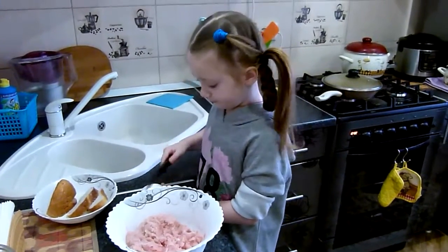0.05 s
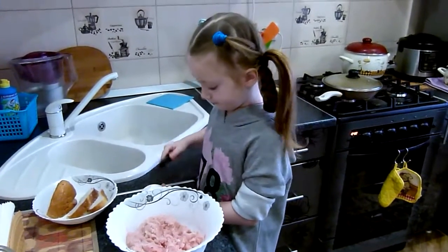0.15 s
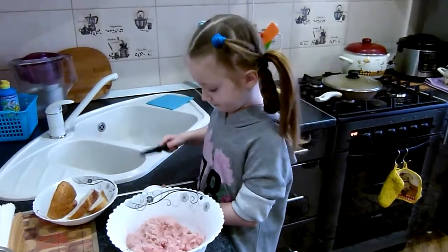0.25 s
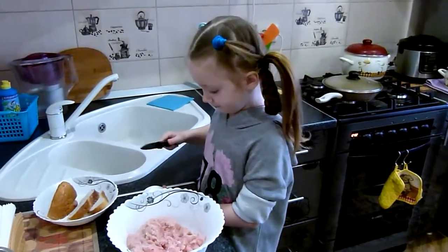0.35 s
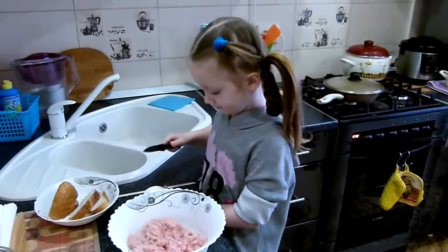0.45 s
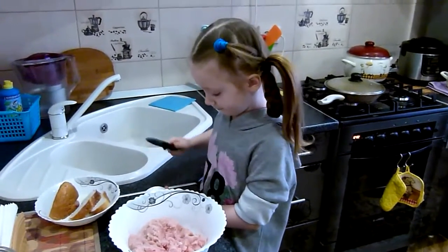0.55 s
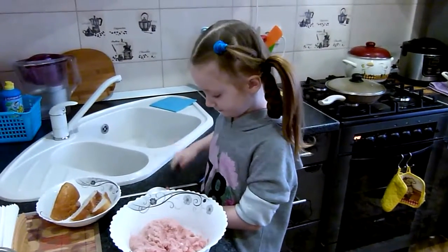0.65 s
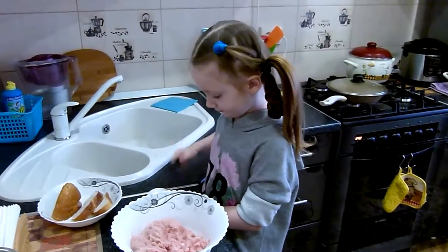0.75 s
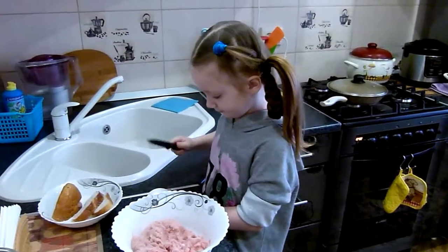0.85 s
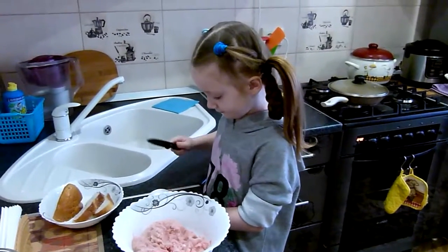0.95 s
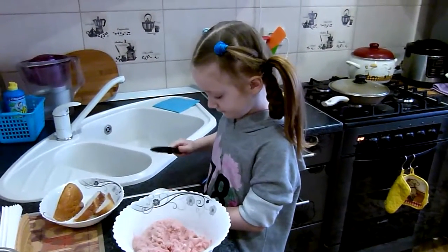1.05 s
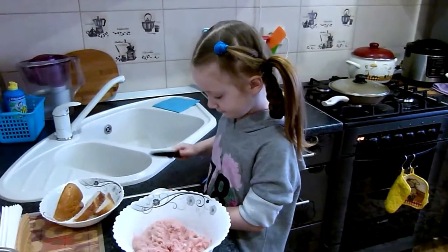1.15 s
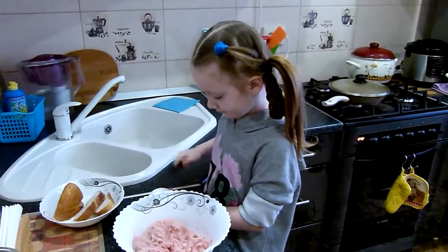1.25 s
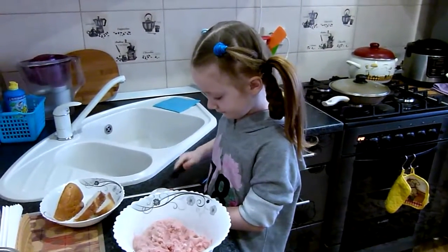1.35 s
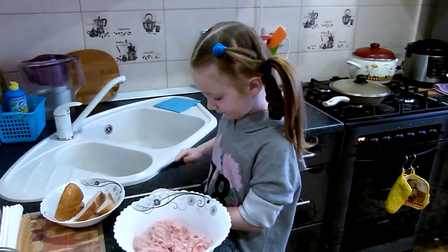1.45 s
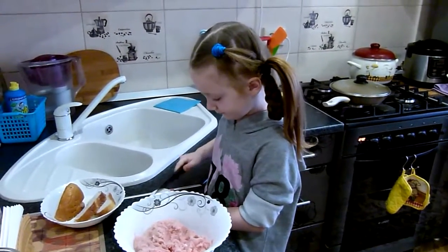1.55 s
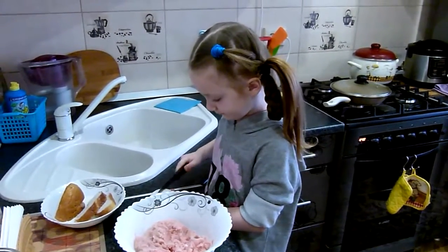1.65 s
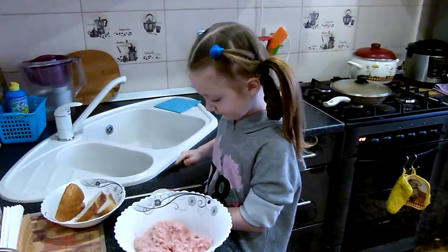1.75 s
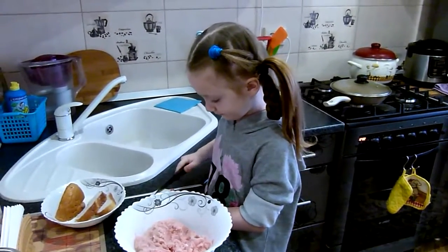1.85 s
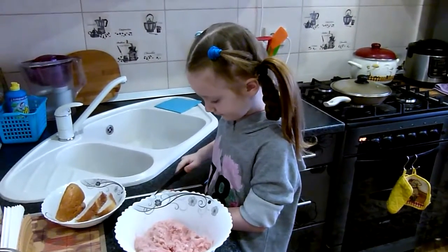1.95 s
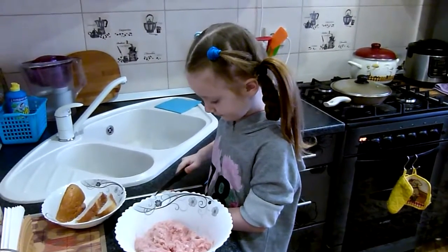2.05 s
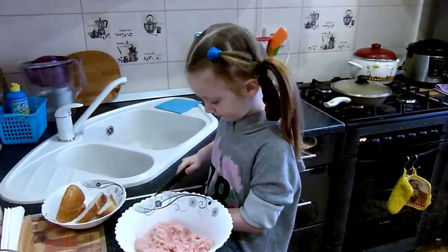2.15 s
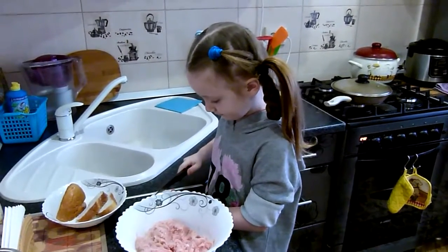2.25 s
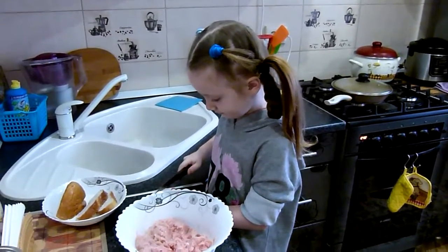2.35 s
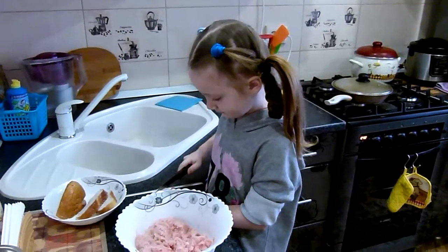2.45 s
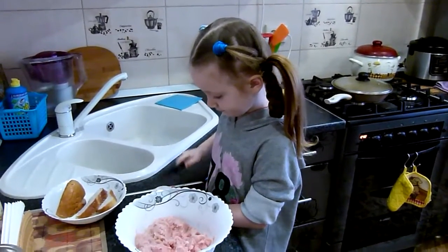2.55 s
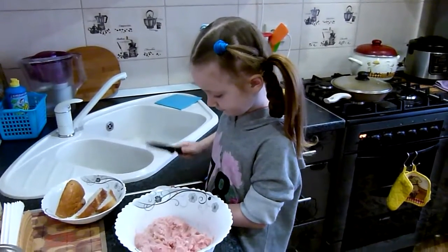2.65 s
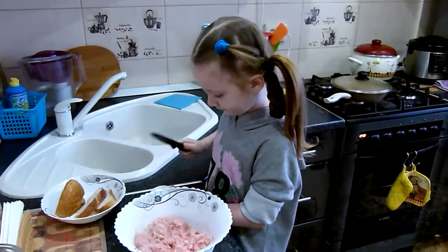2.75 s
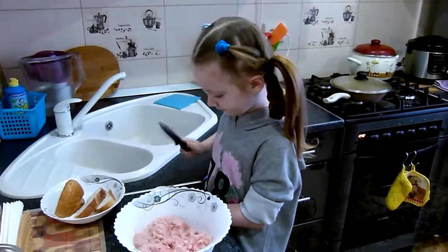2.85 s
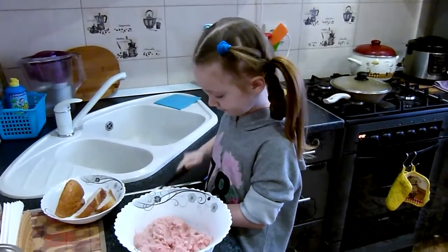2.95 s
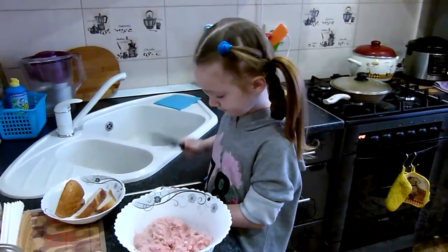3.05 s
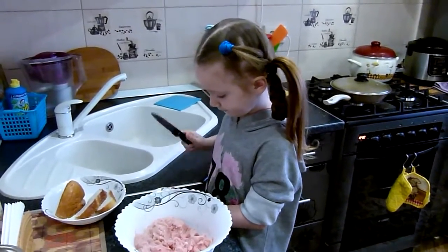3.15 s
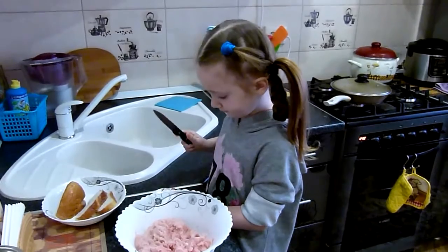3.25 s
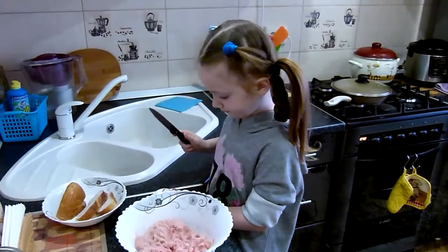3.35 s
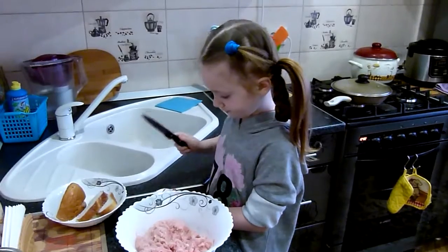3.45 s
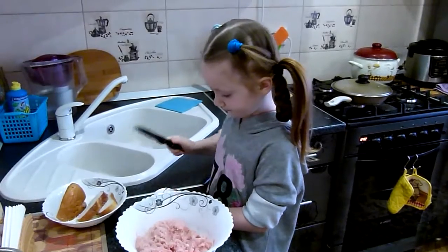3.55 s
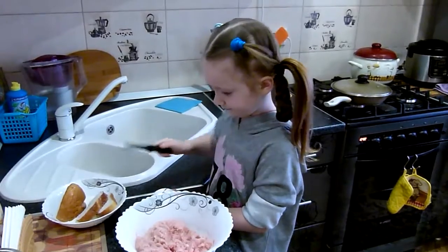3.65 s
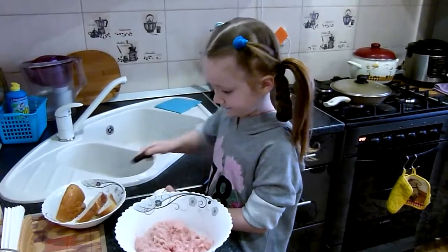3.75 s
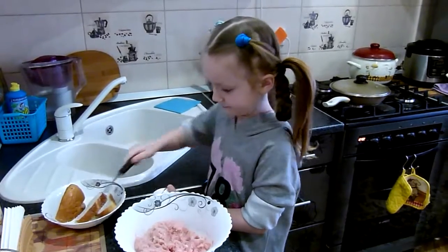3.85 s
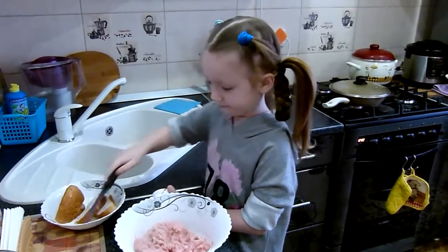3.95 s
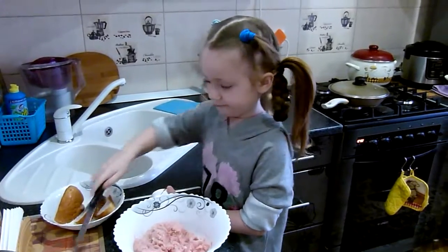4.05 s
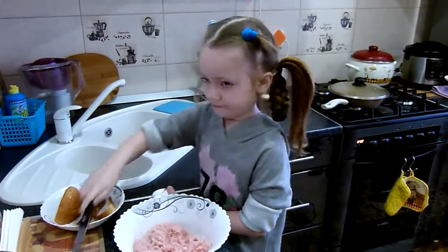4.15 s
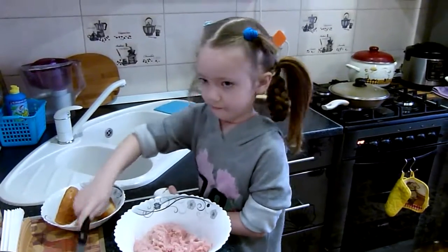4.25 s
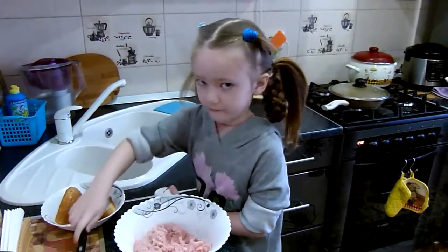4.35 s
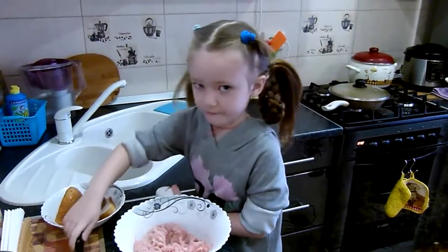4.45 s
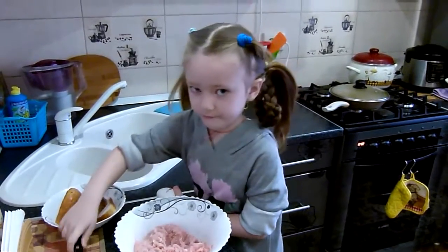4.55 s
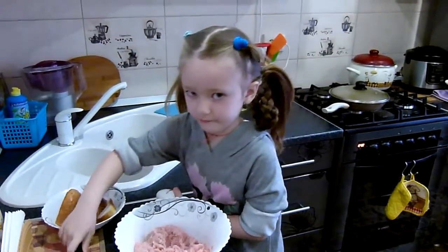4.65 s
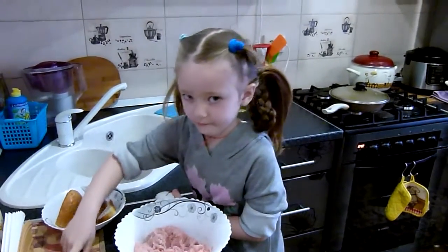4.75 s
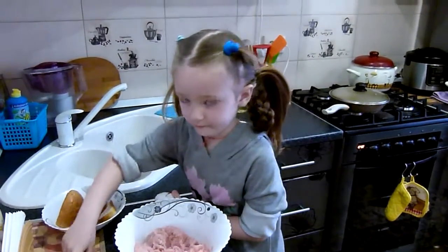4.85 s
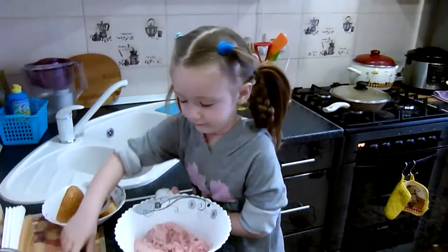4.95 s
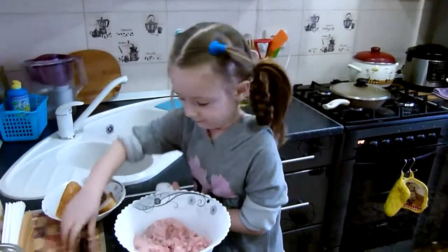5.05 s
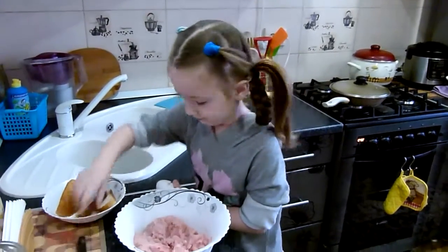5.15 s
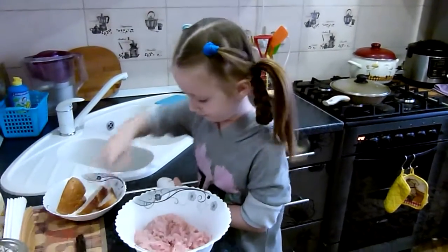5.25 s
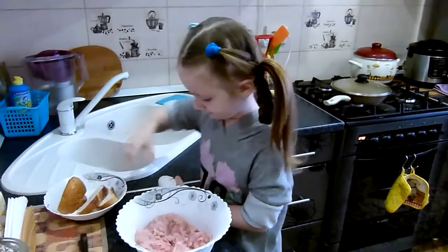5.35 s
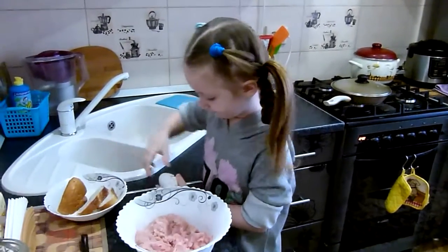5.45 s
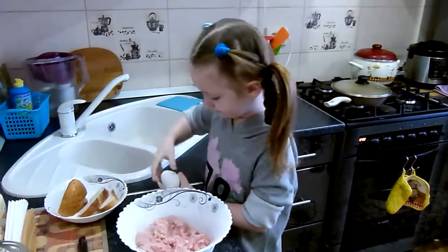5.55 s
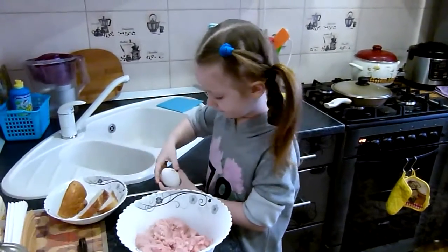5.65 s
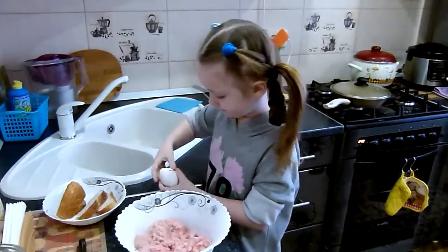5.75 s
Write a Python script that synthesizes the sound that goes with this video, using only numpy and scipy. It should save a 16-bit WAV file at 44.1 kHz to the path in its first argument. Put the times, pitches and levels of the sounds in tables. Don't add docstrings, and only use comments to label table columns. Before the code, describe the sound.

In a small tiled kitchen with a steady soft hush and faint bubbling, a knife taps an egg five times, unevenly, then barely touches it. One loud, fuller crack follows. After a pause the knife is laid down with small knocks, a short scrape and a bright ceramic clink, then settles. Close stereo microphone, slightly dull treble, short room tail.

```python
import sys
import numpy as np
from scipy import signal
from scipy.io import wavfile
from scipy.ndimage import uniform_filter1d

SR = 44100
rng = np.random.default_rng(int(sys.argv[2]) if len(sys.argv) > 2 else 0)


def materialize(psi):
    bounded = np.clip(np.atleast_2d(psi).T, -1, 1)
    quanta = np.round(bounded * 32767).astype(np.int16)
    wavfile.write(sys.argv[1], SR, quanta)


def attenuation_scalar(level_db):
    decades = np.asarray(level_db, float) / 20
    return 10 ** decades


N = 255603
LEAD = 500


def evened(x):
    return x / np.sqrt(np.mean(x ** 2) + 1e-20)


def read(points, hz):
    f, value = np.transpose(points)
    return np.interp(np.log(hz + 1), np.log(f + 1), value)


def add(mix, s, sound):
    part = mix[:, round((s + .001) * SR) - LEAD:][:, :sound.shape[1]]
    part += sound[:, :part.shape[1]]


def causal(db):
    both_sides = np.r_[db, db[-2:0:-1]]
    log_gain = np.log(attenuation_scalar(np.maximum(both_sides, -100)))
    return np.fft.ifft(np.exp(np.conj(signal.hilbert(log_gain)))).real[:2048]


def rings(modes, size=20000):
    t = np.arange(size) / SR
    total = np.zeros(size)
    for hz, db, t60 in modes:
        total += rng.choice([-1, 1]) * attenuation_scalar(db - 60 * t / t60) * np.sin(2 * np.pi * hz * t)
    return total


def pair(frames, hz, same, lean):
    a, b, c, d = rng.standard_normal((frames, len(hz), 4)).T
    like = np.clip(read(same, hz), -1, 1)[:, None]
    left = a + 1j * b
    right = like * left + np.sqrt(1 - like ** 2) * (c + 1j * d)
    return np.array([left, right]) * attenuation_scalar(np.outer([.5, -.5], read(lean, hz)))[:, :, None]


def band(lo_hz, hi_hz):
    sos = signal.butter(2, [lo_hz, hi_hz], "band", fs=SR, output="sos")
    return evened(signal.sosfilt(sos, rng.standard_normal(N)))


def stroke(start, length, rise_s, sag_db_per_s, stop_s):
    t = np.arange(N) / SR - start
    ends = np.clip(t / rise_s, 0, 1) * np.exp(-np.maximum(t - length, 0) / stop_s)
    return ends * attenuation_scalar(sag_db_per_s * np.maximum(t, 0))


# pitch in Hz, level in dB.
HUSH_COLOUR = [(24, -65), (40, -41.5), (81, -40), (212, -6.5), (282, -5), (308, -6), (336, -6.5), (664, -4),
               (944, -6.5), (1050, -6), (2480, -11.5), (5350, -14), (7600, -26), (9880, -57), (16700, -120)]
# pitch in Hz, likeness from -1 to 1.
HUSH_SAME = [(60, 0.32), (170, 1), (450, 0.65), (1250, -0.46), (3440, -0.67), (9460, 0.36)]
# pitch in Hz, left over right in dB.
HUSH_LEAN = [(60, -1), (170, -2), (450, -1), (1250, -0.5), (3440, 0.5), (9460, 0.5)]


def hush():
    frames, hz = N // 256 + 5, np.fft.rfftfreq(1024, 1 / SR)
    patches = rng.standard_normal((frames, 513)).T
    patches = evened(uniform_filter1d(uniform_filter1d(patches, 8, 0), 6, 1))
    depth_db = read([(200, 1.8), (900, 3.1), (2500, .8)], hz)[:, None]
    level_db = read(HUSH_COLOUR, np.minimum(hz, 7400))[:, None] + depth_db * patches
    z = pair(frames, hz, HUSH_SAME, HUSH_LEAN) * attenuation_scalar(level_db)
    z[:, hz > 8000] *= attenuation_scalar(-2.0)
    x = signal.istft(z, nperseg=1024, noverlap=768)[1][:, :N]
    return attenuation_scalar(-62) * x / np.sqrt(np.mean(x.mean(0) ** 2))


# pitch in Hz, time to fade by 60 dB in seconds.
ROOM_FADE = [(150, 0.46), (400, 0.51), (1040, 0.45), (2760, 0.43), (7280, 0.32)]
# pitch in Hz, time to fade by 60 dB in seconds.
BASS_FADE = [(70, .08), (130, 0.14)]
# pitch in Hz, likeness from -1 to 1.
TAIL_SAME = [(60, 0.15), (170, 0.6), (450, 0.87), (1250, 0.73), (3440, 0.17), (9460, 0.69)]
# pitch in Hz, left over right in dB.
TAIL_LEAN = [(60, -0.24), (170, -2.0), (450, -1.5), (1250, -1.0), (3440, 0.97), (9460, -0.35)]
# delay in seconds, left gain, right gain (plain factors).
ECHOES = [(.0019, -0.018, 0.26), (.0046, -1.1, -.8), (.0075, 0.27, 0.26), (.0092, .5, -0.44),
          (0.0137, -0.34, -.4), (.018, 0.13, .4)]


def kitchen(sound, pan_db, tail_db, splinter_ms=.3):
    hz, t = np.fft.rfftfreq(256, 1 / SR), np.arange(480) * 64 / SR
    fade = attenuation_scalar(-60 * t / read(BASS_FADE + ROOM_FADE[1:], hz)[:, None])
    z = pair(len(t), hz, TAIL_SAME, TAIL_LEAN) * fade
    tail = signal.istft(z, nperseg=256, noverlap=192)[1]
    tail *= 1 - np.exp(-np.arange(tail.shape[1]) / SR / 0.0043)
    early = np.zeros(tail.shape)
    early[[0, 1], [4, 0]] = attenuation_scalar(1.5 + np.array([.5, -.5]) * pan_db)
    for s, left, right in ECHOES:
        early[:, round(s * SR * rng.uniform(.93, 1.07))] += left, right
    u = np.arange(400) / SR * 1000 / splinter_ms
    splinters = rng.standard_normal(400) * u * np.exp(-u)
    splinters /= np.linalg.norm(splinters)
    early = signal.oaconvolve(early, splinters[None], axes=1)[:, :tail.shape[1]]
    smear = attenuation_scalar(-37.5 - 40 * np.linspace(1, 0, LEAD) ** 1.1) * rng.standard_normal((2, LEAD))
    response = np.c_[smear, early + attenuation_scalar(tail_db) * tail / np.linalg.norm(tail[0])]
    return signal.fftconvolve(sound[None], response, axes=1)


def punch(modes, pan_db, swell_ms, echo):
    sound = rings(modes, size=9000) * (1 - np.exp(-np.arange(9000) / SR * 1000 / swell_ms))
    sound = np.r_[np.zeros(LEAD), sound]
    left = np.roll(sound, 1) + echo * np.roll(sound, round(0.0034 * SR))
    right = sound + echo * np.roll(sound, round(0.0053 * SR) - 1)
    return attenuation_scalar(np.array([[.5], [-.5]]) * pan_db) * np.array([left, right])


def snap(colour, weight=((1, 0), (2, 0)), modes=()):
    hz = np.minimum(np.fft.rfftfreq(4096, 1 / SR), 7400)
    broad = attenuation_scalar(read(colour, hz) + read(weight, hz)) ** 2
    peaks = sum(attenuation_scalar(db) ** 2 / (1 + ((hz - f) * t60 / 1.4) ** 2) ** 2 for f, db, t60 in modes)
    return causal(10 * np.log10(broad + peaks)) / np.sqrt(broad.mean())


# start in seconds, level in dB, pitch in Hz.
BUBBLES = [(0.059, -46, 795), (0.518, -46, 910), (0.68, -44, 920), (1.36, -49, 960), (2.334, -68, 519),
           (2.492, -57, 781), (2.567, -49, 840), (2.793, -56, 516), (2.863, -59, 835), (2.895, -46, 784),
           (2.919, -48, 770), (3.695, -45, 943), (3.74, -49, 848), (3.949, -52, 828), (4.062, -46, 670),
           (4.199, -49, 1300), (4.309, -66, 501), (5.547, -47, 781), (5.658, -57.5, 616)]


def simmer(mix):
    for s, db, hz in BUBBLES:
        modes = [(hz, 0.1, .045), (hz * 1.06, -4, .035), (hz * 2, -11, .04)]
        add(mix, s - .005, attenuation_scalar(db + 5.5) * punch(modes, 1.2, 9.3, 0.57))


# start in seconds, length in seconds, scrape level in dB, low part in dB.
SLIDES = [
    (4.415, 0.12, -48.5, -5),
    (4.776, 0.041, -62, -22),
    (4.918, 0.16, -58.5, -4.5),
]
# start in seconds, length in seconds, level in dB, bass part in dB.
SHUFFLES = [
    (3.984, .09, -56, -28.5),
    (4.14, 0.13, -57, -29.5),
    (5.052, 0.067, -56.5, -11),
]


def rubbing():
    out = np.zeros(N)
    grain = attenuation_scalar(3.2 * evened(uniform_filter1d(rng.standard_normal(N), 200)))
    for s, length, db, low_db in SLIDES:
        level = attenuation_scalar(db) * stroke(s, length, rise_s=0.011, sag_db_per_s=-33, stop_s=0.017)
        out += level * grain * (band(3440, 6240) + attenuation_scalar(low_db) * band(320, 1500))
    dull, bass = band(254, 523), band(110, 210)
    for s, length, db, bass_db in SHUFFLES:
        level = attenuation_scalar(db) * stroke(s, length, rise_s=0.017, sag_db_per_s=-66.5, stop_s=.04)
        out += level * (dull + attenuation_scalar(bass_db) * bass)
    return attenuation_scalar(-5.5) * kitchen(out, 1.1, 2.2, 0.02)[:, LEAD:N + LEAD]


# start in seconds, blow in dB, left over right in dB.
CLINK = [
    (4.551, -18.5, 5.5),
]
# pitch in Hz, level in dB, time to fade by 60 dB in seconds.
DISH = [(498.6, -15.5, 0.46), (781, -13.5, 0.29), (1156, -19.5, 0.49), (1240, -12.5, 0.25),
        (1977, -9.5, 0.34), (2982, -9.5, 0.46), (4175, -4.5, 0.27), (4900, -20, 0.22), (5580, -4, 0.22),
        (6140, -25, 0.25), (7014, -18.5, 0.32), (8920, -19, 0.3)]
# pitch in Hz, level in dB.
CLINK_COLOUR = [(120, -49), (300, -20), (600, -1.5), (1300, 7.5), (2500, -2), (4500, -3), (6500, -7),
                (7500, -19.5)]


def clink(mix):
    s, db, pan_db = CLINK[0]
    damped = [(f, level, t60 * 0.33) for f, level, t60 in DISH]
    twins = [(f * 1.006, level - 3.5, t60 * 0.24) for f, level, t60 in DISH]
    sound = attenuation_scalar(-8.0) * (rings(damped) + rings(twins))
    no_bass = signal.butter(2, 300, "high", fs=SR, output="sos")
    sound = signal.sosfilt(no_bass, sound)
    sound[:2048] += attenuation_scalar(9.5) * snap(CLINK_COLOUR)
    add(mix, s, attenuation_scalar(db) * kitchen(sound, pan_db, 3.2, 0.15))
    add(mix, s, attenuation_scalar(db - 7.0) * punch(twins + damped, pan_db, .4, 0.18))


# pitch in Hz, level in dB, time to fade by 60 dB in seconds.
HOLLOW = [(635, 0, 0.051), (781, -7, .06), (940, -0.5, 0.057), (1196, -2, 0.055)]
# pitch in Hz, level in dB, time to fade by 60 dB in seconds.
BLADE = [(4600, -6.5, 0.013), (4930, -6, 0.041), (5000, -3, .08), (5360, -9.5, .02)]
# pitch in Hz, level in dB, time to fade by 60 dB in seconds.
TAP_PUNCH = [(55.8, -58.5, 0.034), (1300, -0.5, 0.0077), (2725, -0.5, 0.0082), (4910, 0.5, 0.01),
             (6292, -5, .014)]


def tap(mix, s, db, body_db, mid_db, blade_db, pan_db, colour, tail_db):
    weight = [(150, -11.5), (450, body_db + 11), (1100, body_db + 10),
              (1900, mid_db + 8.0), (3300, mid_db + 10.5), (4300, -1.5)]
    modes = [(f, level + body_db + 10.0, t60) for f, level, t60 in HOLLOW]
    modes += [(f, level + blade_db + 16.5, t60) for f, level, t60 in BLADE]
    add(mix, s, attenuation_scalar(db + 10.0) * kitchen(snap(colour, weight, modes), pan_db, tail_db, 0.51))
    add(mix, s, attenuation_scalar(db + blade_db / 2 + 8.5) * punch(TAP_PUNCH, pan_db, 1.34, 0.33))


# start in seconds, blow in dB, hollow body in dB, middle in dB.
TOUCHES = [
    (4.407, -29.5, -19.5, -17),
    (4.439, -39, -15.5, -23),
    (4.88, -46.5, -13, -19),
    (4.933, -44, -24, -16.5),
    (5.034, -44, -40, -19),
    (5.064, -39.5, -19, -7),
    (5.092, -41.5, -16, -6),
]
# pitch in Hz, level in dB per Hz.
TOUCH_COLOUR = [(35, -49), (60, -33), (152, -9), (252, -26), (334, -1.5), (625, -4), (691, 4),
                (2620, -13.5), (4910, -8.5), (7500, -19.5), (9750, -48), (16500, -120)]
TOUCH_BLADE_DB, TOUCH_PAN_DB = -19.5, 8.5


def touches(mix):
    for s, db, body_db, mid_db in TOUCHES:
        tap(mix, s, db, body_db, mid_db, TOUCH_BLADE_DB, TOUCH_PAN_DB, TOUCH_COLOUR, 6.8)
    s, db = TOUCHES[0][:2]
    add(mix, s, attenuation_scalar(db - 24) * punch(DISH[4:9], TOUCH_PAN_DB, 3.0, .3))


# start in seconds, blow in dB, hollow body in dB, blade ring in dB, left over right in dB.
TAPS = [
    (0.176, -17.5, -18, -21.5, 1.5),
    (0.778, -9, -15, -14, 2.5),
    (1.394, -7, -17, -16, 2),
    (1.67, -12, -14, -13.5, 6),
    (1.95, -7.5, -12, -18, 7.5),
    (2.631, -36.5, -3.5, -24.5, 5.5),
]
# pitch in Hz, level in dB per Hz.
LIGHT_COLOUR = [(88, -70), (150, -27), (480, -9), (633, -3.5), (879, 1), (1070, -5.5), (2720, -12),
                (3420, -23), (4980, -7), (7500, -17.5), (9750, -46), (16500, -120)]
# pitch in Hz, level in dB per Hz.
FLAT_COLOUR = [(35, -83), (60, -66.5), (182, -59.5), (348, -9), (385, -15.5), (532, -1), (1460, -5),
               (1820, -2.5), (2140, -7), (5010, -7), (7500, -15.5), (9750, -46), (16500, -120)]
# pitch in Hz, level in dB per Hz.
EDGE_COLOUR = [(35, -88), (60, -52), (334, -50), (434, -29), (543, -5), (917, -4.5), (995, -13),
               (1190, -3.5), (1370, -8), (2680, -8.5), (3700, -19), (5010, -5), (7500, -19.5), (9750, -49),
               (16500, -120)]
# pitch in Hz, level in dB per Hz.
TIP_COLOUR = [(35, -82), (60, -41), (219, -29), (434, -15), (565, -6), (1190, -3), (1370, -3), (2420, -2),
              (3480, -14), (5010, -0.5), (7500, -9.5), (9750, -42), (16500, -120)]
# pitch in Hz, level in dB per Hz.
BRUSH_COLOUR = [(150, -29.5), (450, -17.5), (633, 1.5), (850, -14.5), (1250, -10.5), (2000, -7),
                (4000, -14), (6200, -7), (7500, -22.5)]
# pitch in Hz, level in dB, time to fade by 60 dB in seconds.
STEEL = [(4880, -5, .12), (5010, -7, .1), (5063, -0.4, 0.12), (6250, 0, 0.049)]
# pitch in Hz, level in dB, time to fade by 60 dB in seconds.
SHELL = [(632.5, -5.5, .2), (527, -9, .15), (781, -6.5, .15)]


def taps(mix):
    colours = [LIGHT_COLOUR, FLAT_COLOUR, EDGE_COLOUR, EDGE_COLOUR, TIP_COLOUR, BRUSH_COLOUR]
    for (s, db, body_db, blade_db, pan_db), colour in zip(TAPS, colours):
        tap(mix, s, db, body_db, -10, blade_db, pan_db, colour, 4.47)
        add(mix, s, attenuation_scalar(db + blade_db - 9.5) * kitchen(rings(STEEL, size=9000), pan_db, 4.0, .3))
        add(mix, s, attenuation_scalar(db + 1.3 * body_db - 8) * punch(SHELL, pan_db, 5.0, .4))


# start in seconds, blow in dB, left over right in dB.
CRACK = [
    (3.035, -1, 2.5),
]
# pitch in Hz, level in dB per Hz.
CRACK_COLOUR = [(24, -82.5), (40, -44.5), (270, -22.5), (352, -14), (478, -10.5), (636, 1), (679, -7),
                (758, -3), (828, -7.5), (1080, -6), (1150, -7.5), (1560, -10), (1860, -14.5), (5840, -6.5),
                (7600, -15), (9880, -51), (16700, -120)]
# pitch in Hz, level in dB, time to fade by 60 dB in seconds.
CRACK_PUNCH = [(80, -44, 0.062), (187, -27.5, 0.036), (960, -1, 0.0054), (2970, -6.5, 0.0061),
               (5730, -2, 0.0098)]


def crack(mix):
    s, db, pan_db = CRACK[0]
    s += .0008
    modes = [(f, level - 10.0, t60) for f, level, t60 in HOLLOW[:2]]
    add(mix, s, attenuation_scalar(db + 11.5) * kitchen(snap(CRACK_COLOUR, modes=modes), pan_db, 6.97, 0.74))
    add(mix, s, attenuation_scalar(db + 3.0) * punch(CRACK_PUNCH, pan_db, 0.43, 0.32))


def scene():
    mix = hush() + rubbing()
    simmer(mix)
    clink(mix)
    touches(mix)
    taps(mix)
    crack(mix)
    return mix


def roll_off(x):
    return signal.sosfilt(signal.butter(12, 10060, fs=SR, output="sos"), x)


# pitch in Hz,
# level in dB.
FINAL_COLOUR = [(20, -4.5), (7500, 1), (7800, -25), (8030, -29.5), (8200, -14), (8600, -8.5), (9100, -14),
                (9600, -18.5), (9900, -29), (10150, -52), (20000, -82.5)]


def record(dry):
    rounded = .8 * np.tanh(dry / .8)
    colour = causal(read(FINAL_COLOUR, np.fft.rfftfreq(4096, 1 / SR)))
    finished = signal.oaconvolve(rounded, colour[None], axes=1)[:, :N]
    return roll_off(finished)


dry = scene()
out = record(dry)
materialize(out)
```